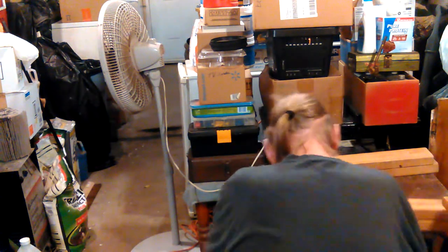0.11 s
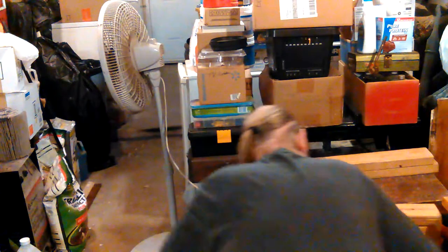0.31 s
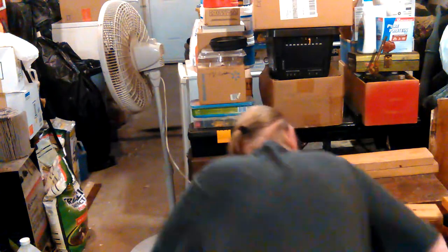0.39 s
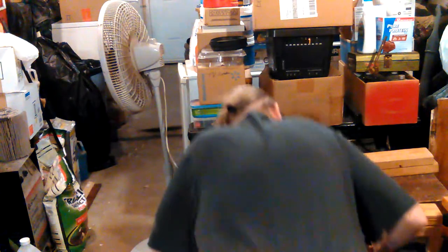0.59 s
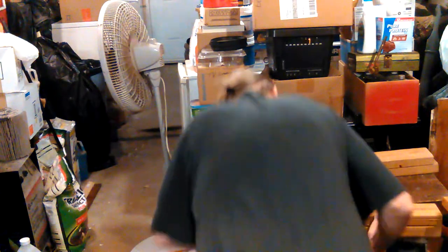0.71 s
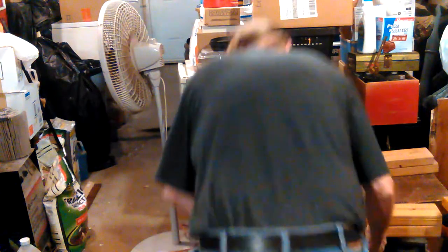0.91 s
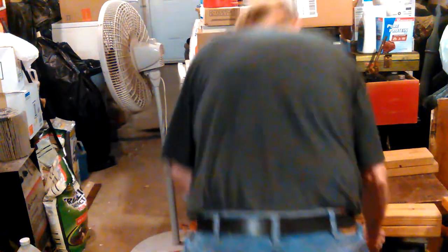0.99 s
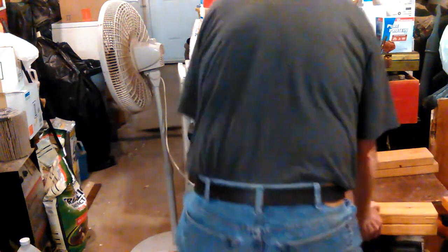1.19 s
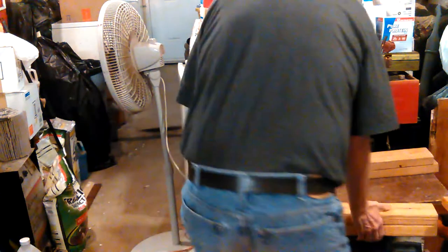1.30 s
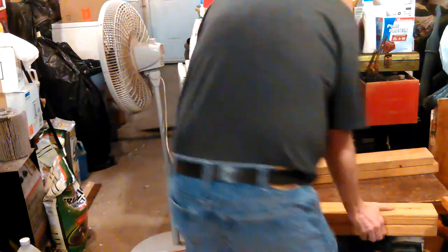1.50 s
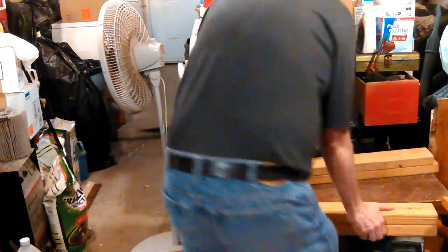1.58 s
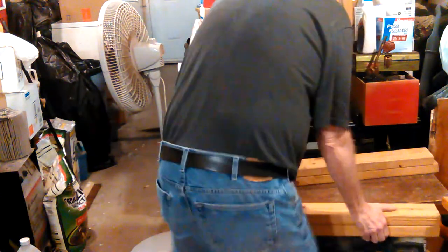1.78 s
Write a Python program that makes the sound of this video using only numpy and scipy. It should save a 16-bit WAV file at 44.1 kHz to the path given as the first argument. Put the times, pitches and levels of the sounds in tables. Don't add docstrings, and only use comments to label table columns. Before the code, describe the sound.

Wooden boards knock and scrape on a stack in a cluttered garage. Faint touches come first, then a quick cluster of low clunks and gritty skids at 0.22-0.35 s. After quiet taps near 0.5 s, a sharp bright skid at 0.7 s starts a rough, stuttering drag until 1.25 s, with cloth rustle. Single dull knocks follow at 1.45 and 1.78 s, over low hum and short echoes.

```python
import sys
import numpy as np
from scipy import signal
from scipy.fft import rfft, irfft
from scipy.io import wavfile
from scipy.ndimage import uniform_filter1d

SR = 44100
rng = np.random.default_rng(int(sys.argv[2]) if len(sys.argv) > 2 else 0)


def materialize(psi):
    bounded = np.clip(np.atleast_2d(psi).T, -1, 1)
    quanta = np.round(bounded * 32767).astype(np.int16)
    wavfile.write(sys.argv[1], SR, quanta)


def convert_level_to_amplitude(level_db):
    exponent = np.asarray(level_db, float) / 20
    return 10 ** exponent


N = 79380


def in_time(rows):
    s, value = np.transpose(rows)
    return np.interp(np.arange(N) / SR, s, value)


def at_hz(points, hz):
    p = np.array(points)
    return np.interp(np.log(np.maximum(hz, 1)), np.log(p[:, 0]), p[:, 1])


def rms_one(x):
    return x / np.sqrt(np.mean(x ** 2) + 1e-20)


def coloured(x, points):
    gain = convert_level_to_amplitude(at_hz(points, np.fft.rfftfreq(len(x), 1 / SR)))
    return irfft(rfft(x) * gain, len(x))


def band_pass(x, low_hz, high_hz, order):
    sos = signal.butter(order, [low_hz, high_hz], "band", fs=SR, output="sos")
    return signal.sosfilt(sos, x)


def drift(rate_hz):
    r = np.exp(-2 * np.pi * rate_hz / SR)
    wander = signal.lfilter([1], [1, -2 * r, r * r], rng.standard_normal(N + SR))
    return rms_one(wander[SR:])


def resonance(x, hz, width_hz):
    r = np.exp(-np.pi * width_hz / SR)
    top = np.array([1, 0, -1]) * (1 - r * r) / 2
    return signal.lfilter(top, [1, -2 * r * np.cos(2 * np.pi * hz / SR), r * r], x)


def ringing(x, modes):
    return rms_one(sum(convert_level_to_amplitude(db) * rms_one(resonance(x, hz, width)) for hz, width, db in modes))


def grains(per_s, spread_db):
    size = convert_level_to_amplitude(spread_db * np.minimum(rng.exponential(1, N), 5)) * rng.choice([-1, 1], N)
    return rms_one(size * (rng.random(N) < per_s / SR))


def room_hum():
    # (frequency [Hz], level [dB])
    hum_colour = [(12, -52), (20, -3), (94, -5), (120, -20.5), (947, -26.5), (1180, -27.5), (1390, -36.5),
                  (6000, -38), (14500, -46)]
    hum_db = -62
    return convert_level_to_amplitude(hum_db) * rms_one(coloured(rng.standard_normal(N), hum_colour))


def garage(x):
    # (frequency [Hz], time [s])
    decay_times = [(100, 0.44), (300, 0.29), (800, 0.3), (2000, 0.28), (5000, 0.21), (13000, 0.21)]
    room_db, gap_s, bass_db = -4, 0.004, -2.5
    t, tail = np.arange(SR // 2) / SR, 0
    for low in 80 * 2. ** np.arange(8):
        band = band_pass(rng.standard_normal(len(t)), low, min(2 * low, 0.45 * SR), 2)
        band = band * convert_level_to_amplitude(-60 * t / at_hz(decay_times, low * 2 ** 0.5))
        tail = tail + band * (t > gap_s) * convert_level_to_amplitude(bass_db * (low < 600))
    return convert_level_to_amplitude(room_db) * signal.fftconvolve(x, tail / np.sqrt(np.sum(tail ** 2)))[:N]


def rustle():
    # (time [s], level [dB])
    rustle_level = [(0.0, -58), (0.21, -60.5), (0.516, -68), (0.736, -72), (0.862, -52.5), (0.962, -51.5),
                    (1.042, -61), (1.178, -55.5), (1.228, -70), (1.362, -76.5), (1.8, -69.5)]
    # (frequency [Hz], level [dB])
    rustle_colour = [(120, -31), (200, 4.5), (727, -41.5), (968, -9), (1240, -13.5), (1340, -2),
                     (5610, -5.5), (14500, -32.5)]
    loudness = convert_level_to_amplitude(in_time(rustle_level) + 2.0 * drift(36))
    return loudness * rms_one(coloured(grains(22000, 0.67), rustle_colour))


def dragging():
    # (time [s], level [dB])
    pressure = [
        (0.42, -60.5),
        (0.684, -55),
        (0.712, -41),
        (0.862, -45.5),
        (0.872, -41),
        (1.084, -47.5),
        (1.152, -59),
        (1.162, -40.5),
        (1.25, -96),
    ]
    # (frequency [Hz], width [Hz], level [dB])
    body_modes = [(205, 17, 2.5), (322.5, 81, 8.5), (420, 50, -21), (852, 69, -3), (1650, 73, -16.5),
                  (2300, 210, -14)]
    slips_per_s, broad_db, cut_hz = 1500, -7, 1400
    slips = grains(slips_per_s, 3.6) * convert_level_to_amplitude(1.6 * drift(38))
    body = ringing(slips, body_modes)
    broad = rms_one(band_pass(slips, 130, cut_hz, 2))
    start, end = pressure[0][0], pressure[-1][0]
    fade = np.interp(np.arange(N) / SR, [start - 0.08, start, end, end + 0.14], [0, 1, 1, 0])
    return convert_level_to_amplitude(in_time(pressure) - 2) * fade * rms_one(body + convert_level_to_amplitude(broad_db) * broad)


def skids():
    # (time [s], level [dB], length [s], centre [Hz])
    skid_events = [(.0, -59, 0.15, 3070), (0.039, -59, 0.094, 5700), (0.228, -32.5, 0.034, 4630),
                   (0.256, -34, 0.049, 4000), (0.312, -31.5, 0.022, 4630), (0.34, -45, 0.0042, 6240),
                   (0.462, -56, .01, 5200), (.525, -55, 0.023, 4000), (0.681, -36.5, 0.024, 4170),
                   (0.69, -35, 0.01, 4630), (0.715, -24.5, 0.013, 5100), (.737, -18.5, 0.0029, 5100),
                   (0.743, -42.5, 0.034, 4170), (0.844, -65, 0.0092, 3000), (0.876, -38, 0.02, 4840),
                   (0.935, -54, 0.01, 4770), (0.967, -70, 0.011, 3500), (1.011, -58, .02, 5000),
                   (1.047, -45.5, 0.014, 4300), (1.072, -51, 0.01, 5500), (1.125, -42, 0.015, 3420),
                   (1.132, -55.5, 0.016, 4000), (1.45, -47.5, 0.022, 5760), (1.616, -53.5, 0.028, 2400),
                   (1.628, -62, 0.018, 4700), (1.777, -45, 0.017, 4000)]
    # (frequency [Hz], width [Hz], level [dB])
    edge_modes = [(1730, 200, 3), (3000, 360, 1.5), (4410, 200, -3), (5540, 200, -1.5), (6320, 270, 1),
                  (6540, 430, 0), (7370, 200, -7.5)]
    ring_db, grit_spread_db, top_hz = -12.5, 2.85, 7700
    shortest_rise_s, swell_share = 0.0022, 0.12
    t60_s, octaves = 0.066, 1.34
    t, out = np.arange(N) / SR, np.zeros(N)
    grit = grains(15000, grit_spread_db)
    grit = grit + convert_level_to_amplitude(ring_db) * ringing(grit, edge_modes)
    half_width = 2 ** (octaves / 2)
    for s, db, length, hz in skid_events:
        a, b = int(s * SR), min(N, int((s + length + t60_s * 1.8) * SR))
        u = t[a:b] - s
        rise = np.minimum(u / max(shortest_rise_s, swell_share * length), 1)
        fall = convert_level_to_amplitude(-60 * np.maximum(u - length, 0) / t60_s)
        scrape = band_pass(grit[a:b], hz / half_width, min(hz * half_width, 0.45 * SR), 1)
        out[a:b] += convert_level_to_amplitude(db) * rise * fall * scrape
    return signal.sosfilt(signal.butter(1, top_hz, fs=SR, output="sos"), out)


def clunks():
    # (time [s], peak level [dB], centre [Hz], spread [octaves])
    blows = [(0.079, -46.5, 1100, 1.05), (0.132, -45.5, 1500, 0.58), (.138, -39, 230, 0.75),
             (0.219, -39.5, 600, 0.71), (.253, -23.5, 260, 0.85), (0.257, -24, 900, 1.4),
             (.266, -25, 400, 1.12), (.271, -26, 1300, 0.54), (0.28, -24.5, 1000, .8),
             (0.292, -49, 800, 1.1), (0.337, -38, 160, 0.51), (.519, -45, 220, 1), (.535, -45.5, 1150, .4),
             (0.704, -36, 200, 0.31), (0.852, -36, 1600, 0.5), (0.874, -38, 330, .6),
             (.895, -45, 1650, 0.29), (0.984, -36, 225, 0.67), (1.01, -58, 890, .3),
             (1.163, -34.5, 420, 0.44), (1.45, -38.5, 240, 0.68), (1.506, -47.5, 260, .6),
             (1.776, -30.5, 200, 0.55), (1.781, -48, 1100, 0.93)]
    # (frequency [Hz], level [dB], time to die by 60 dB [s])
    board_modes = [(144, -4, 0.067), (207.5, 0.5, 0.06), (315, -3.5, 0.069), (413.6, -2, 0.063),
                   (521, -1.5, 0.038), (764, -1, 0.043), (890, -4.5, 0.053), (1036, -4, 0.03),
                   (1139, -1, 0.041), (1309, 0, 0.035), (1612, -2, 0.08), (1877, -4, .035), (2252, 5, .03),
                   (3730, 8, 0.021)]
    rise_cycles, low_cut_hz, uneven_db, detune = 0.3, 110, 2, 0.015
    out, t = np.zeros(N + SR), np.arange(SR // 4) / SR
    chance = rng.standard_normal((len(blows), 3, len(board_modes)))
    hz, mode_db, t60 = np.transpose(board_modes)[:, :, None]
    for (s, db, centre_hz, octaves), (gain, tune, sign) in zip(blows, chance[..., None]):
        near = np.exp(-0.5 * (np.log2(hz / centre_hz) / octaves) ** 2)
        level = convert_level_to_amplitude(db - 3.5 + mode_db + uneven_db * gain - 60 * t / t60)
        rings = near * np.sign(sign) * level * np.sin(2 * np.pi * hz * (1 + detune * tune) * t)
        swell = 1 - np.exp(-t * centre_hz / rise_cycles)
        start = int(s * SR)
        out[start:start + len(t)] += rings.sum(axis=0) * swell
    return signal.sosfilt(signal.butter(2, low_cut_hz, "high", fs=SR, output="sos"), out[:N])


def scene():
    wood = clunks() + skids() + dragging()
    return np.tile(wood + garage(wood) + rustle() + room_hum(), (2, 1))


def patchy_width(mid):
    low_hz, full_hz, most = 4000, 9000, 0.7
    hz, _, spec = signal.stft(mid, SR, nperseg=2048, noverlap=1024)
    band = (np.log(np.maximum(hz, 100) / 100) * 9).astype(int)
    share = most * np.clip((hz - low_hz) / (full_hz - low_hz), 0, 1) ** 0.75
    draw = rng.random((band.max() + 1, spec.shape[1] // 2 + 1)).repeat(2, axis=1)
    patch = draw[band, :spec.shape[1]] < share[:, None]
    turn = np.exp(2j * np.pi * rng.random(spec.shape))
    level = np.sqrt(uniform_filter1d(np.abs(spec) ** 2, size=15, axis=0))
    return signal.istft(level * turn * patch, SR, nperseg=2048, noverlap=1024)[1][:N]


def low_pass(x):
    return signal.sosfilt(signal.butter(12, 14770, fs=SR, output="sos"), x)


def record(dry):
    mid = signal.sosfilt(signal.cheby2(24, 50, 14750, fs=SR, output="sos"), dry[0])
    side = patchy_width(mid)
    return low_pass(np.array([mid + side, mid - side]))


dry = scene()
out = record(dry)
materialize(out)
```